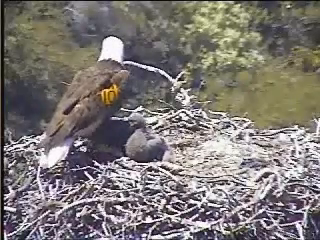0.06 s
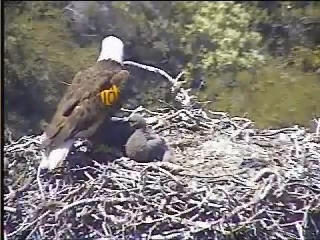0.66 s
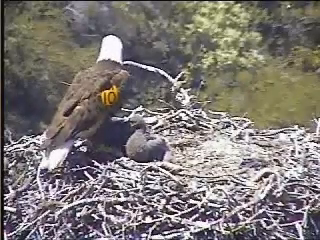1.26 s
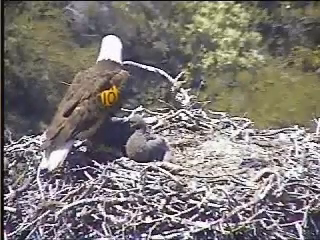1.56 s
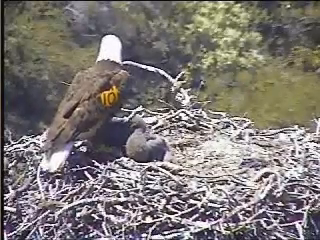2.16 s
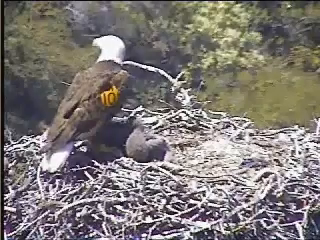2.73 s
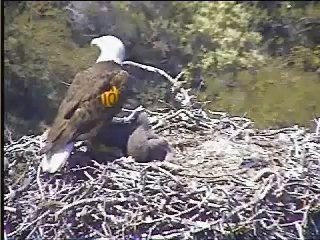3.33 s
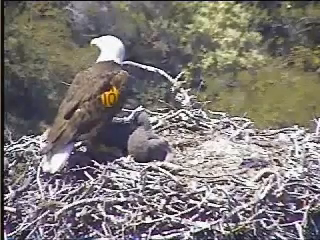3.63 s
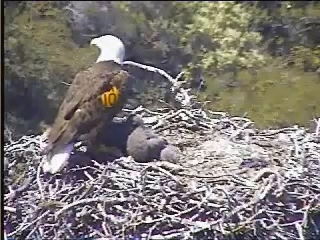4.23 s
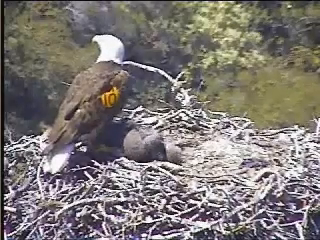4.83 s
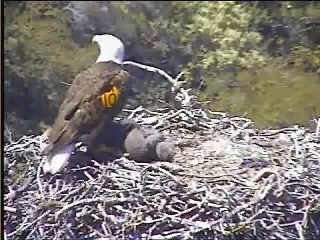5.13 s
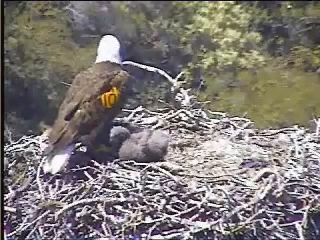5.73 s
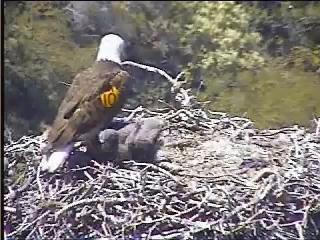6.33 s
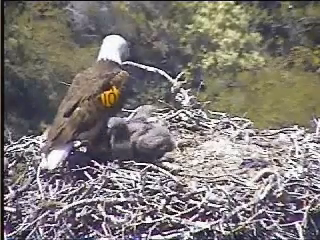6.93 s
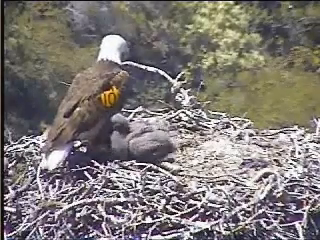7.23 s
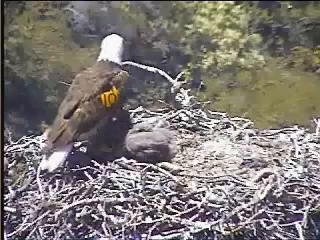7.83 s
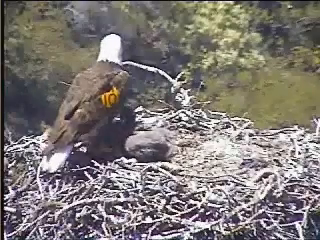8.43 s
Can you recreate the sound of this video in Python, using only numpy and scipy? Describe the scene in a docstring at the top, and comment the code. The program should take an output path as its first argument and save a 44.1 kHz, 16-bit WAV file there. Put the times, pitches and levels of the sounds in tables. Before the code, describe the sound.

Small songbirds chirp, trill and buzz in fast, high phrases outdoors, over distant bird chatter and a steady low rush and hiss.

```python
"""Small songbirds in the scrub around an eagle's nest, every note a sliding tone scattered by a wooded slope.
From the start: rush, hiss and mains hum of a fixed microphone, and far birds' chatter with stray chirps.
Upslurs alternate with triplets, ending in a squeak and a twitter; tinkling notes follow. A buzzy note at
3.4 s leads to a downslur and a trill, then a lull with a faint twig click at 5.46 s. From 6 s come warbles,
pips and chips; the microphone takes a soft low thump at 7.2 s, and a second buzz sounds at 7.9 s."""
import sys
import numpy as np
from scipy import signal
from scipy.fft import rfft, irfft
from scipy.io import wavfile
from scipy.ndimage import uniform_filter1d

SR = 44100
rng = np.random.default_rng(int(sys.argv[2]) if len(sys.argv) > 2 else 0)


def wav_out(sig):
    """Save sig, one row per channel (or a flat mono array), as 16-bit PCM at SR to the path in sys.argv[1]."""
    wavfile.write(sys.argv[1], SR, np.round(np.clip(np.atleast_2d(sig).T, -1, 1) * 32767).astype(np.int16))


N = 374409


def undb(db):
    """Decibels to gain."""
    return 10 ** (np.asarray(db) / 20)


def noise(colour):
    """Unit-rms noise shaped by (freq_hz, level_db) points."""
    hz, db = np.transpose(colour)
    bins_hz = np.maximum(np.fft.rfftfreq(N, 1 / SR), 1)
    gain = undb(np.interp(np.log(bins_hz), np.log(hz), db))
    out = irfft(rfft(rng.standard_normal(N)) * gain, N)
    return out / out.std()


def walk(rate_hz, size):
    """Random wander: straight lines between unit-normal knots."""
    knots = rng.standard_normal(2048)
    return np.interp(np.arange(size) * rate_hz / SR % 2047, np.arange(2048), knots)


def add(track, start_s, sound):
    """Mix a sound into a track."""
    i = int(np.clip(start_s * SR, 0, len(track) - 1))
    track[i:i + len(sound)] += sound[:len(track) - i]


# rush spectrum: freq_hz, relative_db
RUSH_SPECTRUM = [(15, -34), (30, -5), (55, 0), (80, 0.5), (105, -6.5), (180, -4), (270, -0.5), (310, -3),
                 (400, 0), (850, -0.5), (980, -8), (1130, -0.5), (1330, -17), (1800, -51)]
# hiss spectrum: freq_hz, relative_db
HISS_SPECTRUM = [(500, 2), (1300, 0.5), (2600, 0), (4000, -4.5), (5500, -1), (7000, -7.5), (9500, -13.5),
                 (10400, -23), (11400, -26.5), (12600, -14.5), (13500, -19)]
# mains partials: freq_hz, level_db
HUM_PARTIALS = [(59.2, -68), (120, -74)]


def microphone_noise(rush_db=-52, hiss_db=-56.5):
    """Steady low rush, thin hiss and mains hum."""
    t = np.arange(N) / SR
    hum = sum(np.sqrt(2) * undb(db) * np.sin(2 * np.pi * hz * t) for hz, db in HUM_PARTIALS)
    return undb(rush_db) * noise(RUSH_SPECTRUM) + undb(hiss_db) * noise(HISS_SPECTRUM) + hum


def thump(start_s=7.228, pitch_hz=66, rise_s=.018, level_db=-51):
    """Soft low knock that swells and dies within a few cycles."""
    t = np.arange(SR // 4) / SR
    swell = (t / rise_s * np.exp(1 - t / rise_s)) ** 2
    out = np.zeros(N)
    add(out, start_s, undb(level_db) * swell * np.sin(2 * np.pi * pitch_hz * t))
    return out


# loudness contour of the far birds: time_s, level_db
FAR_CONTOUR = [(0.0, -52), (0.13, -52), (0.19, -45.5), (0.45, -46), (0.85, -50), (1.5, -51), (1.7, -44),
               (2.3, -43), (2.64, -46), (2.98, -54), (3.38, -54), (3.8, -46.5), (4.02, -51), (4.45, -40.5),
               (4.79, -51), (5.26, -53), (5.8, -54), (6.28, -43), (6.62, -48.5), (7.86, -49.5),
               (8.27, -43.5), (8.47, -43)]
# chatter spectrum: freq_hz, relative_db
CHATTER_SPECTRUM = [(2400, -17.5), (3000, -4.5), (3500, 5.5), (4100, 7), (4800, 1), (5600, -10),
                    (7000, -25), (9000, -101)]


def far_chatter(offset_db=-3.5, flicker_db=2):
    """Far birds, blurred by the trees into a flickering noise band."""
    contour_db = np.interp(np.arange(N) / SR, *np.transpose(FAR_CONTOUR))
    return noise(CHATTER_SPECTRUM) * undb(contour_db + offset_db + flicker_db * walk(25, N))


# far birds' repertoire: syllable
FAR_SYLLABLES = ["lift", "tinkle", "slide", "far_rise"]


def far_chirps(rate_hz=22, offset_db=-5.5, spread_db=2.5, pitch_spread=.06):
    """Short random chirps of far birds, following the chatter's level."""
    out = np.zeros(N)
    for slot in range(int(N / SR * rate_hz)):
        start_s = (slot + rng.random()) / rate_hz
        loud, high = rng.standard_normal(2)
        level_db = np.interp(start_s, *np.transpose(FAR_CONTOUR)) + offset_db + spread_db * loud
        pitch_ratio = .95 * (1 + pitch_spread * high)
        add(out, start_s, gesture(rng.choice(FAR_SYLLABLES), level_db, pitch_ratio, length_ratio=.7))
    return out


def slope_scatter(song, near_t60_s=.12, far_t60_s=.58, far_db=-5, onset_s=.005):
    """Near branches scatter at once; the hillside returns a longer, fainter tail."""
    t = np.arange(int(1.5 * SR)) / SR
    decay = undb(-60 * t / near_t60_s) + undb(far_db - 60 * t / far_t60_s)
    onset = 1 - np.exp(-(t / onset_s) ** 2)
    response = rng.standard_normal(len(t)) * decay * onset
    return signal.fftconvolve(song, response / np.linalg.norm(response))[:N]


def envelope_db(t, attack_s, release_s):
    """Linear attack and release, floored at -40 dB."""
    ramp = np.minimum(t / max(attack_s, 1 / SR), (t[-1] - t) / max(release_s, 1 / SR))
    return 20 * np.log10(np.clip(ramp, .01, 1))


def sliding_tone(time_s, pitch_hz, level_db, swing_hz=0, throb=0, pinch=0, waver=.007, flutter_db=1.3):
    """Sliding near-sine, as from a syrinx; a fast swing of pitch and strength makes it buzz."""
    t = np.arange(0, max(time_s[-1], .01), 1 / SR)
    size = len(t)
    settled_hz, haste_hz, settle_s = 125.5, 26, .125
    swing_rate_hz = (settled_hz + haste_hz * np.exp(-t / settle_s)) * (1 + .025 * walk(90, size))
    swing_rad = 2 * np.pi * np.cumsum(swing_rate_hz) / SR
    swing = np.sin(swing_rad) * np.minimum(t / .07, 1)
    glide_hz = uniform_filter1d(np.interp(t, time_s, pitch_hz), size=64)
    tone_hz = glide_hz * (1 + waver * walk(400, size)) + swing_hz * swing
    gain = undb(np.interp(t, time_s, level_db) + flutter_db * walk(250, size))
    gain *= 1 + throb * np.sin(swing_rad) + pinch * np.cos(2 * swing_rad)  # pinch chokes each turn
    edge_s = np.minimum(t, t[-1] - t)
    gate = np.sin(np.pi / 2 * np.clip(edge_s / .002, 0, 1)) ** 2
    return np.sqrt(2) * gate * gain * np.sin(2 * np.pi * np.cumsum(tone_hz) / SR)


# buzzy notes: start_s, length_s, base_pitch_hz, level_db
BUZZES = [(3.403, 0.37, 4082, -35.8), (7.879, 0.38, 4105, -34.2)]


def buzzes(scoop_hz=1300, scoop_s=.029, climb_hz_per_s=450):
    """Long rasping notes that scoop up, then creep higher while the pitch swings fast."""
    out = np.zeros(N)
    for start_s, length_s, base_pitch_hz, level_db in BUZZES:
        t = np.arange(0, length_s, 1 / SR)
        hz = base_pitch_hz - scoop_hz * np.exp(-t / scoop_s) + climb_hz_per_s * t
        db = level_db + envelope_db(t, attack_s=.026, release_s=.06)
        tone = sliding_tone(t, hz, db, swing_hz=315, throb=.18, pinch=.4, waver=.017, flutter_db=1.7)
        add(out, start_s, tone)
    return out


# pitch slides by gesture, one point list per stroke: time_s, pitch_hz
STROKES = { "hook": [[(0, 6500), (.014, 5800), (.028, 5000), (.044, 4350), (.058, 4330), (.072, 4500)]],
           "upslur": [[(0, 2510), (.03, 2560), (.05, 2740), (.08, 3400), (.089, 3840), (.107, 4620)]],
           "triplet": [[(0, 4005), (.01, 5820)], [(.012, 3900), (.018, 5100), (.025, 5750)], [(.0245, 3900),
           (.032, 5150), (.041, 5680)]], "tinkle": [[(0, 5150), (.016, 4650), (.027, 4150), (.037, 3720)]],
           "squeak": [[(0, 2850), (.02, 3000), (.04, 3050), (.052, 3450), (.064, 4400)], [(.0635, 3950),
           (.0675, 4400)]], "twitter": [[(0, 5800), (.004, 6640), (.009, 5744)], [(.015, 3640),
           (.022, 4100), (.028, 4530)]], "trill": [[(0, 4400), (.006, 6350), (.016, 4950), (.025, 4220),
           (.034, 3550)]], "whistle": [[(0, 4700), (.012, 5330), (.07, 5430)]], "plunge": [[(0, 7240),
           (.022, 6740), (.042, 6200), (.056, 5050), (.072, 4100), (.088, 3500)]], "downslur": [[(0, 4350),
           (.018, 4280), (.04, 4020), (.06, 3720), (.09, 3380), (.125, 3160), (.19, 3060)]],
           "warble": [[(0, 5730), (.007, 4274), (.016, 3576), (.027, 3300), (.052, 4176), (.066, 3840)]],
           "chip": [[(0, 5350), (.008, 5180), (.017, 5130), (.026, 4850), (.037, 4470)]],
           "pip": [[(0, 5850), (.009, 5450), (.024, 5050)], [(.026, 4800), (.034, 4600), (.041, 4750),
           (.05, 5050)]], "far_peep": [[(0, 3510), (.06, 3310)]], "far_moan": [[(0, 2560), (.02, 2620),
           (.04, 2760)]], "far_tick": [[(0, 7060), (.006, 6010), (.016, 5600)]], "fall": [[(0, 4345),
           (.01, 3904), (.036, 3050), (.06, 2530)]], "droop": [[(0, 4100), (.02, 3950), (.04, 3550),
           (.055, 3000), (.075, 2650), (.11, 2300)]], "slide": [[(0, 5095), (.015, 4700), (.035, 4450)]],
           "swoop": [[(0, 5650), (.02, 5000), (.04, 4250), (.055, 3750)]], "lift": [[(0, 3006),
           (.012, 3750), (.022, 4200)]], "far_rise": [[(0, 2500), (.015, 2800), (.025, 3500),
           (.035, 4150)]], }
# envelope and scatter by gesture: attack_s, release_s, scatter_over_direct_db
VOICING = {"hook": (0.0032, 0.025, -2), "upslur": (.052, .008, -13), "triplet": (.005, .001, -6.5),
           "tinkle": (0.024, 0.0033, -1.5), "squeak": (.02, 0.0011, -11), "twitter": (0.0018, .003, -4),
           "trill": (.009, 0.0028, -5.5), "whistle": (0.016, .008, 1), "plunge": (.006, .05, -1.5),
           "downslur": (0.036, 0.06, -6.5), "warble": (.005, 0.0067, -8.5), "chip": (0.008, 0.004, -4.5),
           "pip": (.006, .011, -4), "far_peep": (.003, 0.029, 17.5), "far_tick": (0.0024, 0.0078, 5.5),
           "fall": (.016, .008, -7), "slide": (0.0049, 0.017, -3), "lift": (.004, 0.0067, -3),
           "droop": (.065, .012, -8), "swoop": (.005, .025, -4), "far_rise": (.005, .015, 1),
           "far_moan": (.008, .015, 3)}
# first stroke by gesture: offset_db
LEAD_IN_DB = {"triplet": -3.5, "pip": -6.5, "twitter": 2.5, "squeak": -3}
# burr by gesture: swing_hz
BURR_HZ = {"far_peep": 330, "far_moan": 200, "whistle": 70}
# strength over pitch, peak near 4 kHz: pitch_hz, gain_db
PRESENCE = [(2500, -30), (2750, -24), (3000, -17), (3300, -12), (3550, -9), (3850, -.5), (4100, 1.5),
            (4350, -2), (4700, -5), (5700, -11.5), (7300, -22)]


def gesture(name, base_db, pitch_ratio, length_ratio):
    """Sliding strokes whose strength follows their pitch: a syllable or, cut very short, a click."""
    attack_s, release_s, _ = VOICING[name]
    out = np.zeros(SR // 4)
    for k, stroke in enumerate(STROKES[name]):
        time_s, pitch_hz = np.transpose(stroke)
        length_s = max((time_s[-1] - time_s[0]) * length_ratio, .002)
        t = np.arange(0, length_s, 1 / SR)
        glide_hz = pitch_ratio * np.interp(time_s[0] + t / length_ratio, time_s, pitch_hz)
        stroke_db = base_db + (LEAD_IN_DB.get(name, 0) if k == 0 else 0)
        presence_db = np.interp(glide_hz, *np.transpose(PRESENCE))
        level_db = stroke_db + presence_db + envelope_db(t, attack_s, release_s)
        tone = sliding_tone(t, glide_hz, level_db, swing_hz=BURR_HZ.get(name, 0))
        add(out, time_s[0] * length_ratio, tone)
    return out


# repeated syllables: gesture, count, start_s, period_s, drag_s,
# first_db, middle_db, last_db, pitch_ratio, length_ratio
PHRASES = [ ("fall", 3, .199, 0.126, 0, -41.5, -39, -39, 1, 0.95),
           ("lift", 3, .245, 0.131, 0, -43, -40, -42, 1, .75),
           ("upslur", 11, .3485, .1574, .018, -36.5, -25.7, -33.5, 1.01, .94),
           ("triplet", 10, .4755, .1579, .012, -38, -27.2, -34, .985, 0.95),
           ("twitter", 9, 1.6985, .0523, .005, -33, -34, -45, 0.96, 1.06),
           ("far_tick", 7, 2.348, .0995, 0, -50, -52, -56, .83, 1.76),
           ("plunge", 3, 3.822, .09, 0, -36, -39.5, -35, 0.99, 1),
           ("trill", 8, 4.2915, .0528, .008, -33.5, -30.3, -38.5, 0.98, 1),
           ("pip", 5, 5.317, .082, 0, -46.5, -45, -46.5, 1, 0.97),
           ("chip", 3, 5.824, .087, 0, -47, -42, -40, 1, 1),
           ("far_peep", 2, 5.817, .158, 0, -50, -51.5, -52, 1, .85),
           ("warble", 5, 6.077, .1045, .01, -35, -37, -36.5, 0.99, 1.02),
           ("far_tick", 7, 6.261, .054, 0.015, -43, -44, -47, 1, 1),
           ("pip", 8, 6.754, .0763, 0, -44.5, -34.5, -32.5, 1, 1),
           ("far_tick", 12, 6.72, .103, 0, -53, -51, -43, 1, 1.3),
           ("whistle", 5, 7.36, .14, 0, -52, -48, -49, 1.08, .6),
           ("fall", 3, 7.074, .1695, 0, -36.5, -37, -37, 0.98, 1.05),
           ("chip", 5, 7.366, .073, .003, -31.5, -31.5, -34.5, .995, .98),
           ("whistle", 4, 7.99, .135, 0, -40, -38.5, -41, 1.05, .7),
           ("plunge", 2, 8.292, .104, 0, -36.5, -35, -33, .995, 1), ]


def phrase_notes(drag_power=7, stray_db=.85, stray_pitch=.007):
    """Notes of all phrases: even pace until any closing drag, level along a parabola."""
    notes = []
    for name, count, start_s, period_s, drag_s, *arch_db, pitch_ratio, length_ratio in PHRASES:
        first_db, middle_db, last_db = arch_db
        bulge_db = middle_db - (first_db + last_db) / 2
        for beat in range(count):
            along = beat / (count - 1)
            time_s = start_s + period_s * beat + drag_s * along ** drag_power
            db = first_db + (last_db - first_db) * along + 4 * bulge_db * along * (1 - along)
            loud, high = rng.standard_normal(2)
            note_ratio = pitch_ratio * (1 + stray_pitch * high)
            notes.append((name, time_s, db + stray_db * loud, note_ratio, length_ratio))
    return notes


# lone bird notes and, at 5.46 s, a faint, brief twig click:
# gesture, start_s, base_db, pitch_ratio, length_ratio
LONE_SOUNDS = [ ("hook", .01, -45, .99, 1), ("hook", .121, -41.5, .99, 1), ("hook", .253, -40, .99, 1),
               ("hook", .371, -42, 1, 1.05), ("whistle", 0, -45, .95, .3),
               ("whistle", 0.059, -46, 0.94, 0.75), ("swoop", .505, -46, 1, 1),
               ("lift", .776, -42, .93, 1.1), ("lift", .845, -44, 1, .8), ("lift", 1.09, -43, 1, .6),
               ("lift", 1.25, -43, 1, .6), ("squeak", 1.607, -21.5, 1, 1), ("far_moan", 1.618, -26, 1, 1),
               ("far_moan", 1.8, -35, .98, 1), ("lift", 2.078, -40, 1.05, .8),
               ("lift", 2.128, -42, 1.03, .9), ("far_rise", 2.262, -39, 1, .9),
               ("tinkle", 2.304, -34.5, .99, 1), ("slide", 2.355, -42, 1.02, 1),
               ("tinkle", 2.37, -43, 1, 1), ("tinkle", 2.436, -40.5, 1, 1), ("lift", 2.476, -43, 1.04, .7),
               ("tinkle", 2.499, -40, 1, .95), ("slide", 2.546, -44, 1.05, 1),
               ("tinkle", 2.564, -38.5, 1, .95), ("lift", 2.594, -40, 1.04, .7),
               ("tinkle", 2.629, -39, .99, .95), ("tinkle", 2.694, -40, 1, 1), ("lift", 2.725, -44, 1, .7),
               ("tinkle", 2.759, -46.5, 1, 1), ("whistle", 3.236, -44.5, 0.995, 1.4),
               ("whistle", 3.617, -37, .605, 1.2), ("slide", 3.878, -40.5, 1, 1.1),
               ("slide", 4.0, -43, 1, 1.3), ("downslur", 4.087, -26.7, 1, 1), ("swoop", 4.196, -42, 1, 1),
               ("far_rise", 4.772, -37.5, 1, .95), ("far_rise", 4.855, -42, 1, 1.1),
               ("lift", 4.92, -46, .92, 1), ("swoop", 4.95, -52, 1, 1.2),
               ("far_rise", 5.04, -41.5, 1, 1.05), ("far_peep", 5.115, -54, 1.01, 0.72),
               ("lift", 5.1755, -45, 0.93, 1), ("lift", 5.215, -47, .95, 1), ("lift", 5.425, -47, .97, 1),
               ("far_rise", 5.463, -44, 1, .25), ("whistle", 5.675, -49.5, 1.035, 1.8),
               ("far_peep", 6.178, -46, .85, 0.73), ("pip", 6.645, -42, 1.03, 1),
               ("droop", 6.872, -32.5, 1.01, 1.03), ("far_moan", 7.515, -35.5, .92, 1.8),
               ("chip", 7.735, -43, 1.02, 1), ("fall", 7.781, -41, 1.1, 1),
               ("lift", 7.8335, -40, 1.05, 1.1), ("slide", 7.886, -39, 1, .4),
               ("swoop", 7.905, -39, .88, .8), ("fall", 8.044, -33, 1.02, .85), ("lift", 8.085, -32, 1, .7),
               ("tinkle", 8.186, -33.5, 1.02, 1), ("slide", 8.33, -35.5, .99, 1),
               ("slide", 8.466, -29, .94, .8), ]


def songbirds_and_twig():
    """Lone notes, phrases and one twig click: the direct sound and the share that reaches the slope."""
    direct, to_slope = np.zeros(N), np.zeros(N)
    for name, start_s, base_db, pitch_ratio, length_ratio in LONE_SOUNDS + phrase_notes():
        sound = gesture(name, base_db, pitch_ratio, length_ratio)
        _, _, scatter_db = VOICING[name]
        add(direct, start_s, sound)
        add(to_slope, start_s, undb(scatter_db) * sound)
    return direct, to_slope


def scene(buzz_scatter_db=-6, chirp_scatter_db=1):
    """Birds and twig, direct and by way of the slope, over the background; mono."""
    direct, to_slope = songbirds_and_twig()
    buzz, chirps = buzzes(), far_chirps()
    tails = slope_scatter(to_slope + undb(buzz_scatter_db) * buzz + undb(chirp_scatter_db) * chirps)
    return (direct + buzz + chirps + tails + far_chatter() + thump() + microphone_noise())[None]


def record(dry):
    """The recorder's steep low-pass."""
    cutoff_hz = 12850
    return signal.sosfilt(signal.ellip(12, .2, 70, cutoff_hz, fs=SR, output="sos"), dry)


dry = scene()
out = record(dry)
wav_out(out)
```